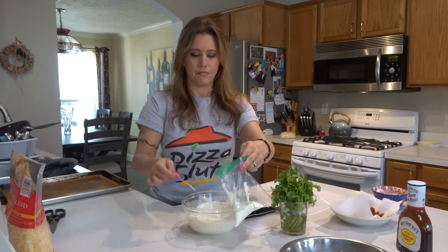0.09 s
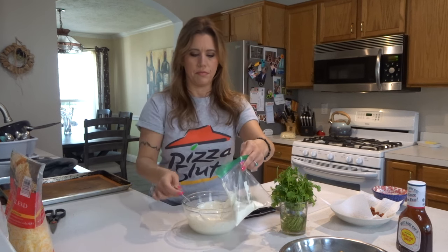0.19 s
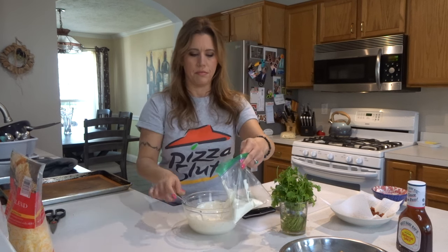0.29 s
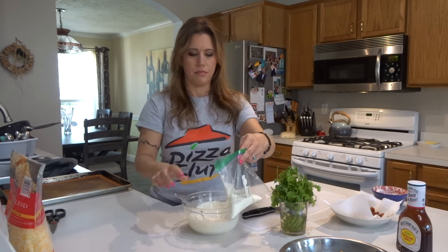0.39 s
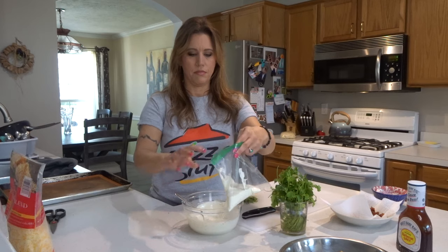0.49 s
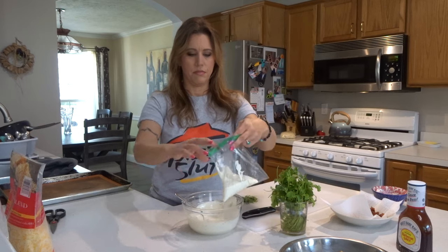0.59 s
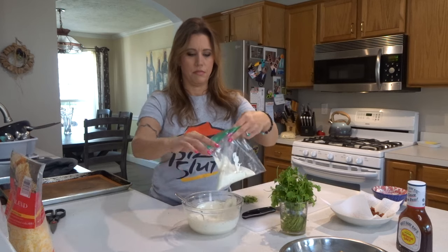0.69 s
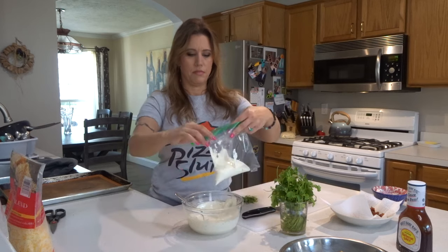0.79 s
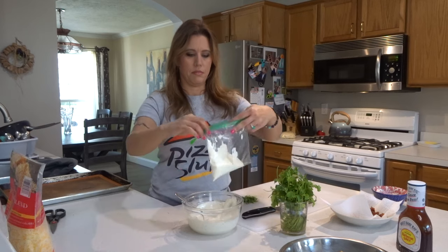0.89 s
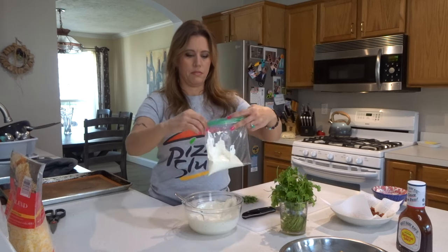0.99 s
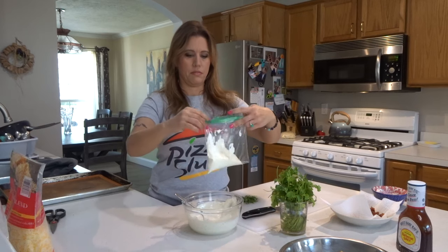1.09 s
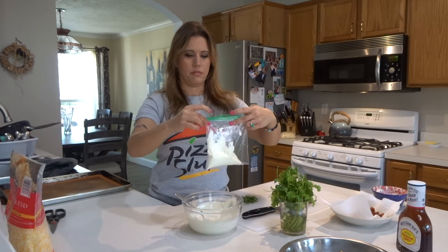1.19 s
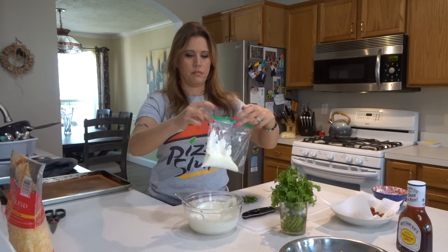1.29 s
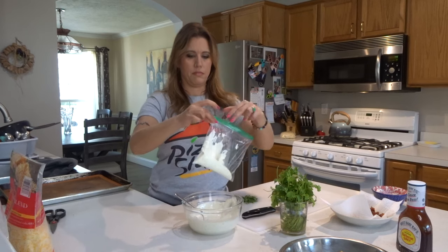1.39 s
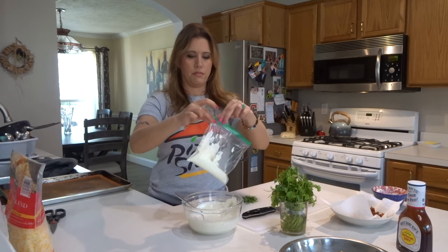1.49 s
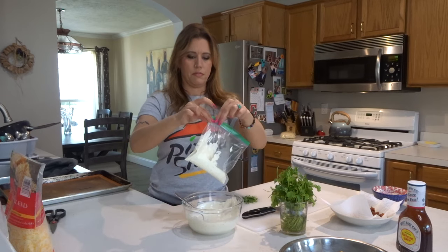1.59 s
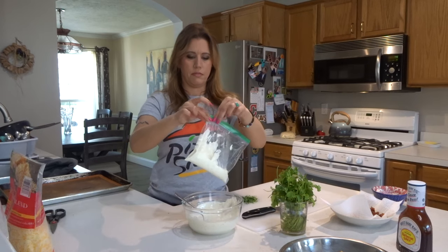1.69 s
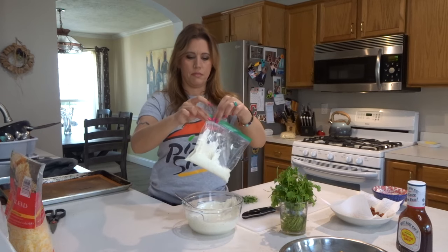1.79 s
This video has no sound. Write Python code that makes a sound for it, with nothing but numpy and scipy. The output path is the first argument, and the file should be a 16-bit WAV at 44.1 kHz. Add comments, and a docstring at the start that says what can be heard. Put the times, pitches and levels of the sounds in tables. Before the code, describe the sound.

One quick glassy clink from a spoon on a bowl, then crisp plastic bag crackles that thin out to small ticks; home kitchen with short echoes, quiet low hum, stereo microphone at modest distance.

```python
"""A glass bowl on a kitchen counter rings out as a spoon drops in and chatters on the rim: fading tones,
each made of two close sines, short bursts of noise for the contacts and a low swelling noise for the
counter's thud. Then a plastic bag snaps and crackles in the hands: short rings, clicks and hiss, with one
faint squeak. The kitchen answers with fading noise echoes, over an appliance rumble of noise and a hum."""
import sys
import numpy as np
from scipy import signal
from scipy.fft import rfft, irfft, next_fast_len
from scipy.io import wavfile
from scipy.ndimage import uniform_filter1d, map_coordinates

SR = 44100
rng = np.random.default_rng(int(sys.argv[2]) if len(sys.argv) > 2 else 0)


def magnitude_from_level(level_db):
    """Linear magnitude for a level in decibels (20 dB per decade)."""
    exponent = np.asarray(level_db, float) / 20
    return 10 ** exponent


def transcribe(signal):
    """Save signal, clipped to [-1, 1], as a 16-bit WAV file at the path in sys.argv[1]."""
    frames = np.atleast_2d(signal).T
    limited = np.clip(frames, -1, 1)
    pcm = np.round(limited * 32767).astype(np.int16)
    wavfile.write(sys.argv[1], SR, pcm)


N = 79380  # length in samples

# spoon touching the glass: start_s, level_db
CONTACTS = [(.2378, -16), (.2428, -19), (.2457, -16), (.2517, -19)]
# bowl tones, one list for each contact: pitch_hz, level_db (before RING_DB), fall_60db_s, split_hz, partner_db
BOWL_TONES = [
    [(5857, -33, .12, 40, -5), (6900, -33, .06, 90, -3), (9325, -43, .3, 30, -2), (10660, -42, .25, 60, -2)],
    [(6150, -29.5, .5, 14, -4)],
    [(1575, -33, .28, 14, -3), (3144, -35, .4, 20, -6), (3289, -34, .4, 15, -6), (3779, -34, .35, 30, -4),
     (4298, -21, .55, 18, -4), (4365, -34, .3, 30, -3), (4470, -35, .3, 50, -3)],
    [(2800, -20.5, .5, 9.5, -2), (2918, -36, .3, 20, -6)],
]
# colour of the contact noise: pitch_hz, relative_level_db
CRACK_COLOUR = [(500, -36.5), (900, -4), (1300, -10.5), (2000, -6.5), (3000, 0.5), (4500, 7), (5000, -13),
                (6000, 2), (7000, -7.5), (7800, -18), (9300, -12.5), (11000, -10)]
# colour of the counter's thud: pitch_hz, relative_level_db
THUD_COLOUR = [(41, -46), (70, -5), (113, 10.5), (488, 9.5), (880, 6), (961, -1), (1270, -32.5), (1400, 5),
               (1820, -47), (3080, -120)]
# snaps of the bag: start_s, level_db (before the snap gains), body_hz, treble_over_body_db, treble_hz
SNAPS = [(0.624, -21, 3570, -31, 4630), (0.6418, -34, 1510, -1, 6160), (0.6981, -15.5, 2100, -35, 6150),
         (0.7075, -28.5, 3000, -21, 4500), (0.7282, -22.5, 3100, 6.5, 5380), (0.7574, -29, 3250, -5, 6050),
         (0.7624, -41, 2150, -8, 7200), (0.7682, -37, 3060, -8, 4760), (0.7866, -41, 3060, -5.5, 5200),
         (0.8007, -18.5, 3102, 6, 6540), (0.8325, -12, 3430, -11, 4760), (0.842, -21.5, 1887, 15.5, 7800),
         (0.8477, -19, 2910, -17, 5170), (0.8564, -54, 1980, -8, 5190), (0.9309, -24, 4020, 13, 7830),
         (0.9935, -24, 4630, -3, 5540), (1.0606, -34, 2440, -16.5, 5740), (1.1309, -22, 3330, 7, 7840),
         (1.159, -38, 2010, 2, 4510), (1.1884, -31, 3500, 6, 4940), (1.2215, -24.5, 3160, -14, 4960),
         (1.2332, -43, 3100, -1.5, 4940), (1.2631, -30, 4360, -1, 4500), (1.2862, -35, 3540, 9.5, 4800),
         (1.499, -33.5, 3880, -28, 4440), (1.5294, -40, 2130, -25, 4880), (1.6681, -35.5, 2130, 12, 6550),
         (.6972, -14, 3440, -18, 6100)]
# how the hands work the bag: time_s, level_db, brightness_db_per_octave
HANDLING = [(.56, -57.5, -6), (0.622, -49, 0), (0.626, -39.5, -2), (0.659, -63, -15), (0.687, -42.5, -7.5),
            (0.696, -53, 9), (0.701, -30.5, -6.5), (0.719, -47, 7), (0.751, -46.5, 10), (0.77, -36.5, 13.5),
            (.79, -43, 3.5), (0.824, -40, 4.5), (.85, -29, 7), (0.881, -45.5, -6.5), (.925, -53.5, 16),
            (0.935, -38, 7), (0.961, -54, 10), (.995, -47, 13.5), (1.031, -64, 8), (1.07, -42, 3),
            (1.12, -48, 9.5), (1.175, -56, 7), (1.222, -39, 3.5), (1.25, -52, 2.5), (1.3, -59, 5),
            (1.36, -73, 9), (1.519, -63.5, 7), (1.55, -49.5, 5.5), (1.64, -61.5, -2), (1.67, -53, 8),
            (1.69, -64.5, 12), (1.8, -65, 0)]
# colour of the sliding plastic film: pitch_hz, relative_level_db
FILM_COLOUR = [(240, -40), (400, 0.5), (429, -15), (466, -14), (1280, -19.5), (1490, -4.5), (3480, -2),
               (3890, -5.5), (7780, -12.5), (11000, -20.5), (14300, -47), (22000, -120)]
# a finger squeaking along the seal: pitch_hz, width_hz, level_db
SQUEAK_BAND = (2170, 90, -57)
# colour of the appliance rumble: pitch_hz, relative_level_db
RUMBLE_COLOUR = [(20, -30), (35, -9), (70, -3), (88, -40), (110, 1), (147, -9), (250, -1), (310, -1.5),
                 (480, -10.5), (570, -7), (650, -14), (1050, -13.5), (1250, -20.5), (4070, -24.5),
                 (4520, -24.5), (11000, -33.5)]
# how alike left and right are in the rumble: pitch_hz, likeness (1 = same, -1 = opposite)
RUMBLE_ALIKE = [(60, .99), (140, 0.97), (350, 0.93), (700, 0.55), (1500, 0.065), (3000, 0.21),
                (6000, -0.17), (11000, -0.37)]
# how alike left and right are in the echoes: pitch_hz, likeness (1 = same, -1 = opposite)
ECHO_ALIKE = [(100, 1), (300, .96), (700, 0.93), (1500, .75), (3000, 0.49), (6000, -0.34), (11000, 0.084)]
# how long the kitchen echoes last: pitch_hz, fall_60db_s
ECHO_FADE = [(150, 0.54), (1000, 0.82), (4000, 0.58), (10000, 0.5)]

RING_DB, RING_RISE_S = -2.5, 0.0006
PAIR_LAG_TURNS = 0.2  # between left and right, in the upper sine
CRACK_FALL_60DB_S = 0.0076
THUD_S, THUD_DB, THUD_RISE_S, THUD_FALL_60DB_S = 0.2385, -26.5, 0.013, 0.65
SNAP_RING_DB, SNAP_RISE_S = 7.5, 0.0008
BODY_CYCLES, TREBLE_CYCLES = 8.5, 7.8  # cycles in which a ring falls 30 dB
SNAP_CLICK_DB, SNAP_CLICK_FALL_60DB_S = -7, 0.01
GRAIN_HZ, GRAIN_SPREAD_OCTAVES, GRAIN_CYCLES = 3390, 0.81, 2.5  # falls 30 dB in GRAIN_CYCLES
GRAINS_PER_S, GRAIN_SPREAD_DB = 3500, 2.2
CRACKLE_DB, HISS_DB = -4, -6  # relative to the handling level
SQUEAK_S, SQUEAK_LENGTH_S = 1.528, 0.065
RUMBLE_DB = -50.5
HUM_HZ, HUM_DB, HUM_WAVER_HZ, HUM_WAVER_DB = 53, -62, 3, 3
# echo levels relative to each sound, fade-in time of the echoes, left-right balance of the direct sound
RING_WET_DB, CRACK_WET_DB, BAG_WET_DB, SQUEAK_WET_DB = -8, 9, -4, -10
WALL_S, PAN_DB = 0.00067, -0.2
TOP_HZ, TOP_SLOPE = 11030, 120


def bowl():
    """Each tone of the ringing bowl is made of two close sines, so its level sways as it fades."""
    out = np.zeros((2, N))
    lag = np.pi * PAIR_LAG_TURNS * np.array([[1], [-1]])
    for (start_s, _), tones in zip(CONTACTS, BOWL_TONES):
        t = np.maximum(np.arange(N) / SR - start_s, 0)
        rise = 1 - np.exp(-t / RING_RISE_S)
        for hz, db, fall_s, split_hz, partner_db in tones:
            lower = np.sin(2 * np.pi * (hz - split_hz / 2) * t)
            upper = np.sin(2 * np.pi * (hz + split_hz / 2) * t + lag)
            fade = magnitude_from_level(db + RING_DB - 60 * t / fall_s)
            out += fade * rise * (lower + magnitude_from_level(partner_db) * upper)
    return out


def cracks():
    """Steel meets glass: short hard bursts of coloured noise."""
    envelope = np.zeros(N)
    t = np.arange(SR // 10) / SR
    for start_s, db in CONTACTS:
        add(envelope, start_s, magnitude_from_level(db - 60 * t / CRACK_FALL_60DB_S))
    bursts = filtered(envelope * rng.standard_normal(N), causal(CRACK_COLOUR))
    # colouring keeps the overall strength of the envelope
    return unit(bursts) * np.sqrt(np.mean(envelope ** 2))


def thud():
    """The counter booms: low noise that swells and dies."""
    t = np.maximum(np.arange(N) / SR - THUD_S, 0)
    rise = 1 - np.exp(-t / THUD_RISE_S)
    boom = diffuse(noise(THUD_COLOUR, channels=2), ECHO_ALIKE)
    return boom * magnitude_from_level(THUD_DB - 60 * t / THUD_FALL_60DB_S) * rise


def snaps():
    """A crease buckles: a broad click, a short body ring and a treble ring on top."""
    rings, clicks = np.zeros(N), np.zeros(N)
    t = np.arange(SR // 20) / SR
    rise = (1 - np.exp(-t / SNAP_RISE_S)) ** 2
    phases = rng.uniform(0, 2 * np.pi, (len(SNAPS), 2))

    def ring(hz, cycles, phase):
        """A tone that fades within a few of its own cycles."""
        return magnitude_from_level(-30 * t * hz / cycles) * rise * np.sin(2 * np.pi * hz * t + phase)

    for (start_s, db, body_hz, treble_db, treble_hz), (body_phase, treble_phase) in zip(SNAPS, phases):
        body = ring(body_hz, BODY_CYCLES, body_phase)
        treble = magnitude_from_level(treble_db) * ring(treble_hz, TREBLE_CYCLES, treble_phase)
        add(rings, start_s, magnitude_from_level(db + SNAP_RING_DB) * (body + treble))
        click_fade = magnitude_from_level(db + SNAP_CLICK_DB - 60 * t / SNAP_CLICK_FALL_60DB_S)
        add(clicks, start_s, click_fade * rise)
    return rings + clicks * noise(FILM_COLOUR)[0]


def crackle():
    """Many small creases, each a short ring of its own pitch, and the film's hiss, follow the handling."""
    time_s, db, tilt_db = np.transpose(HANDLING)
    t = np.arange(N) / SR
    level = magnitude_from_level(np.interp(t, time_s, db, left=-120))
    tilt_db = np.interp(t, time_s, tilt_db)

    when, size, turn = rng.random((round(GRAINS_PER_S * N / SR), 3)).T
    octaves = GRAIN_SPREAD_OCTAVES * rng.standard_normal(len(when))
    hz = np.clip(GRAIN_HZ * 2 ** octaves, 1300, 11000)[:, None]
    start = (when * N).astype(int)
    k = np.arange(SR // 100)

    # a few creases are much louder than the rest; brightness favours the high or the low ones
    size_db = -GRAIN_SPREAD_DB * np.log(size + 1e-9)[:, None]
    size_db = size_db + tilt_db[start][:, None] * np.log2(hz / GRAIN_HZ)
    fade = magnitude_from_level(size_db - 30 * k / SR * hz / GRAIN_CYCLES)
    rise = 1 - np.exp(-k / SR * hz)
    rings = fade * rise * np.sin(2 * np.pi * (hz * k / SR + turn[:, None]))
    grains = np.bincount((start[:, None] + k).ravel(), rings.ravel(), N + len(k))[:N]
    # even out the strength over 50 ms so that the handling sets it
    grains = grains / np.sqrt(np.abs(uniform_filter1d(grains ** 2, SR // 20)) + 1e-9)
    return level * (magnitude_from_level(CRACKLE_DB) * grains + magnitude_from_level(HISS_DB) * noise(FILM_COLOUR)[0])


def squeak():
    """A finger rubs along the seal: a faint narrow band of noise that fades in and out."""
    hz, width_hz, db = SQUEAK_BAND
    progress = (np.arange(N) / SR - SQUEAK_S) / SQUEAK_LENGTH_S
    fade = np.clip(8 * np.minimum(progress, 1 - progress), 0, 1)
    rub = unit(filtered(rng.standard_normal(N), lambda f: np.exp(-((f - hz) / width_hz) ** 2)))
    return magnitude_from_level(db) * fade * rub


def kitchen(x, wet_db, count=18):
    """Direct sound plus noise echoes that die by pitch, drawn anew for each of count stretches of time."""
    out = x * magnitude_from_level([[PAN_DB], [-PAN_DB]])
    hop = N // count + 1
    mono = np.atleast_2d(x).mean(0)
    for i in range(0, N, hop):
        hz, t, z = signal.stft(rng.standard_normal((2, SR // 2)), SR, nperseg=256)
        fade = magnitude_from_level(-60 * t / along(ECHO_FADE, hz)[:, None])
        tail = diffuse(signal.istft(z * fade, SR, nperseg=256)[1], ECHO_ALIKE)
        tail = tail * (1 - np.exp(-np.arange(tail.shape[1]) / SR / WALL_S))
        tail = tail / np.linalg.norm(tail[0])
        wet = signal.fftconvolve(mono[None, i:i + hop], tail, axes=1)[:, :N - i]
        out[:, i:i + wet.shape[1]] += magnitude_from_level(wet_db) * wet
    return out


def room_tone():
    """Appliance rumble as steady low noise, with a hum that wavers in pitch and level."""
    hum_level = magnitude_from_level(HUM_DB + HUM_WAVER_DB * wobble(6.5))
    hum_hz = HUM_HZ + HUM_WAVER_HZ * wobble(6.41)
    hum = hum_level * np.sin(2 * np.pi * np.cumsum(hum_hz) / SR)
    rumble = diffuse(noise(RUMBLE_COLOUR, channels=2), RUMBLE_ALIKE)
    return magnitude_from_level(RUMBLE_DB) * rumble + hum


def unit(x):
    """Scaled to an average strength (rms) of 1."""
    return x / np.sqrt(np.mean(x ** 2) + 1e-20)


def along(points, hz):
    """Reads a value between (pitch, value) points, on a log pitch axis."""
    f, v = np.transpose(points)
    return np.interp(np.log(hz + 1), np.log(f + 1), v)


def filtered(x, response):
    """Changes the strength of each pitch in x by a response; the padding keeps the end off the start."""
    m = 2 * next_fast_len(x.shape[-1] // 2 + 4096)
    return irfft(rfft(x, m) * response(np.fft.rfftfreq(m, 1 / SR)), m)[..., :x.shape[-1]]


def causal(points):
    """A filter with the gain of (Hz, dB) points that never sounds ahead of its input (minimum phase)."""
    def response(hz):
        c = irfft(np.log(magnitude_from_level(along(points, hz))))
        # fold the backward half of the cepstrum onto the forward half
        c[1:len(c) // 2] *= 2
        c[len(c) // 2 + 1:] = 0
        return np.exp(rfft(c))[:len(hz)]
    return response


def diffuse(pair, alike):
    """Mixes two unrelated noises so that left and right are as alike as the table says."""
    def shares(hz):
        angle = np.arccos(np.clip(along(alike, hz), -1, 1)) / 2
        return np.array([np.cos(angle), np.sin(angle)])

    mid, side = filtered(pair, shares)
    return np.array([mid + side, mid - side])


def noise(colour, channels=1):
    """Random noise with a colour, scaled to rms 1."""
    white = rng.standard_normal((channels, N))
    return unit(filtered(white, lambda hz: magnitude_from_level(along(colour, hz))))


def wobble(rate):
    """A smooth random curve through rate random points a second."""
    return map_coordinates(rng.standard_normal(64), [np.arange(N) * rate / SR])


def add(out, start_s, sound):
    """Lays a sound into out from start_s on."""
    part = out[round(start_s * SR):][:len(sound)]
    part += sound[:len(part)]


def scene():
    """Bowl, bag and room tone together, with the kitchen's echoes."""
    ring = kitchen(bowl(), RING_WET_DB, count=1)
    contacts = kitchen(cracks(), CRACK_WET_DB, count=1)
    hit = ring + contacts + thud()
    bag = kitchen(snaps() + crackle(), BAG_WET_DB)
    rub = kitchen(squeak(), SQUEAK_WET_DB, count=1)
    return hit + bag + rub + room_tone()


def roll_off(x):
    """The treble ends steeply here."""
    return signal.sosfilt(signal.butter(12, 12160, fs=SR, output="sos"), x)


def record(dry):
    """A microphone with a band limit: a steep filter removes the highest treble."""
    mix = filtered(dry, lambda hz: 1 / (1 + (hz / TOP_HZ) ** TOP_SLOPE))
    return roll_off(mix)


dry = scene()
out = record(dry)
transcribe(out)
```